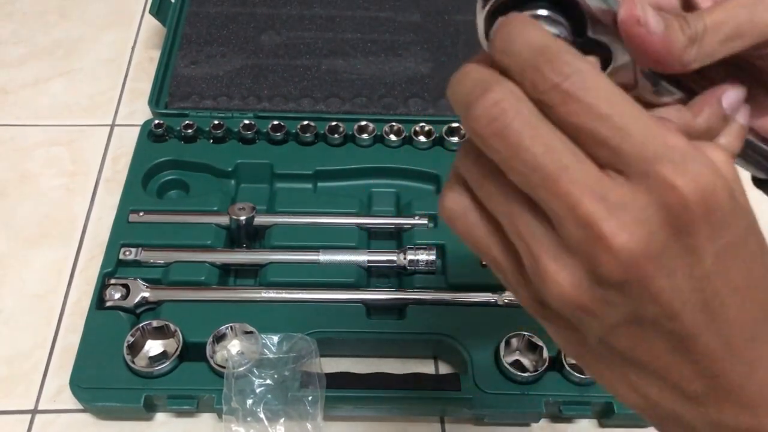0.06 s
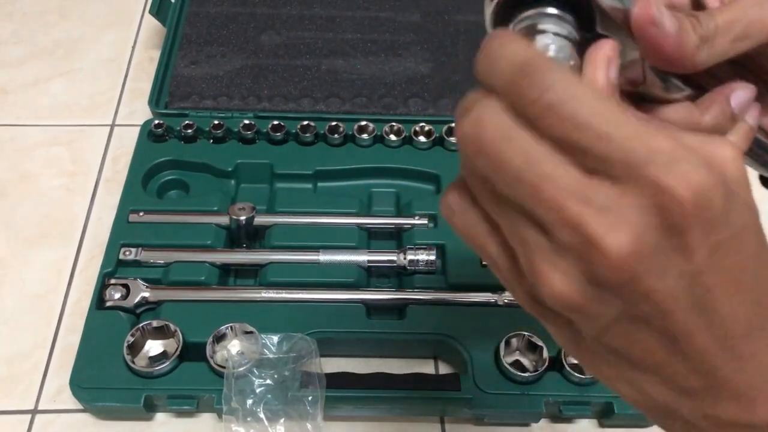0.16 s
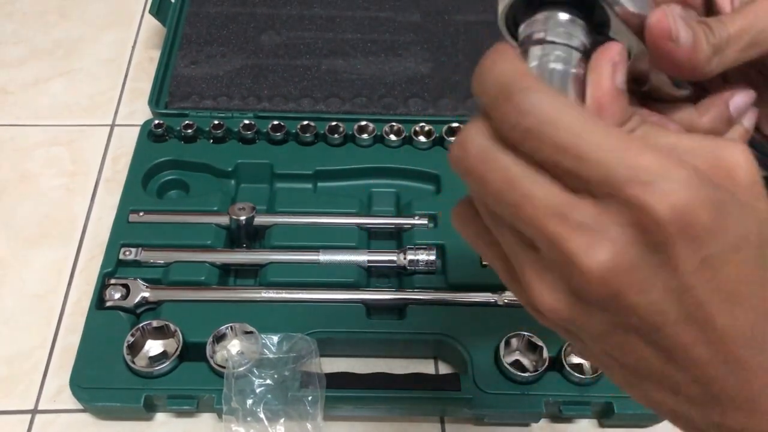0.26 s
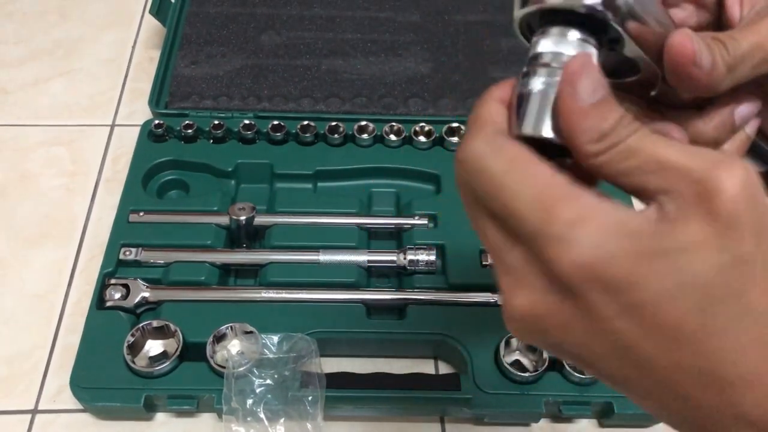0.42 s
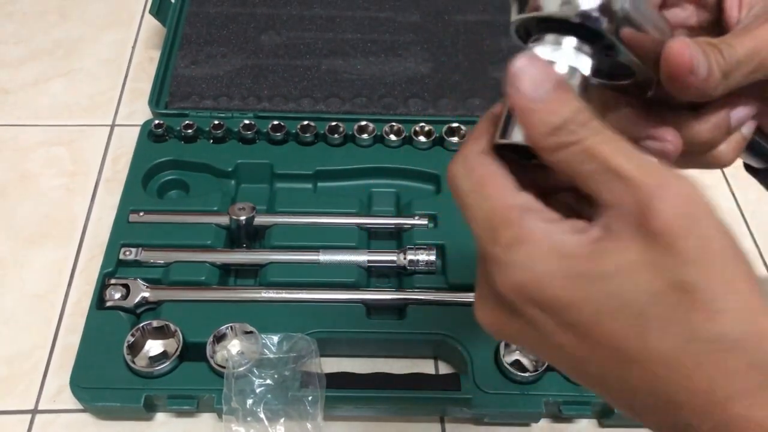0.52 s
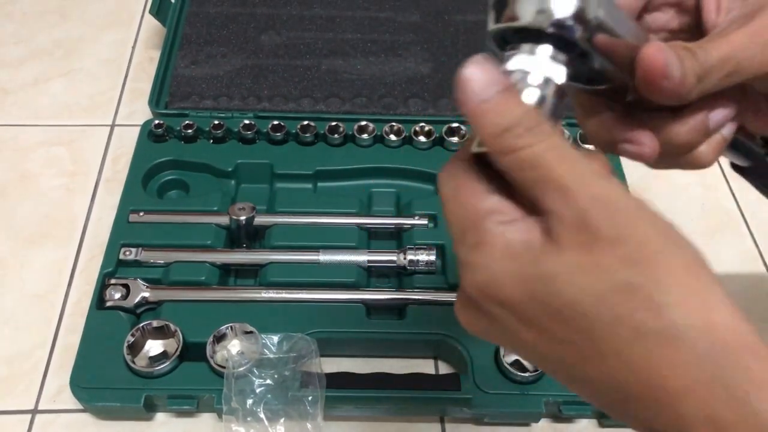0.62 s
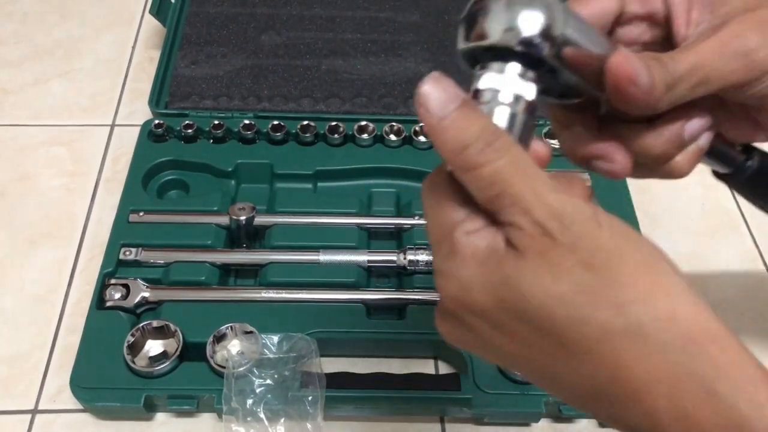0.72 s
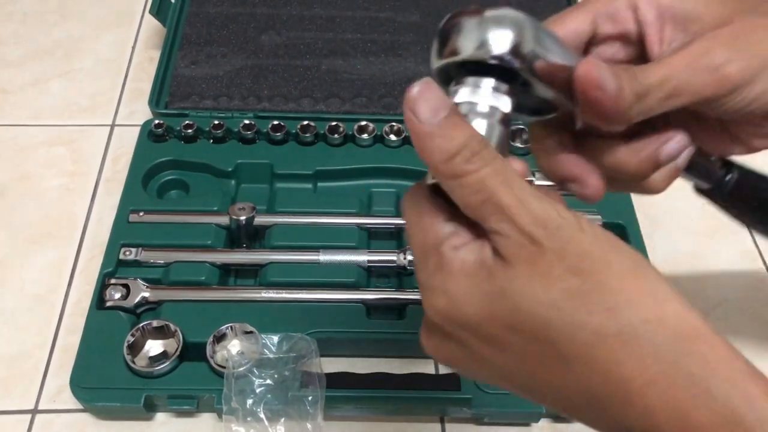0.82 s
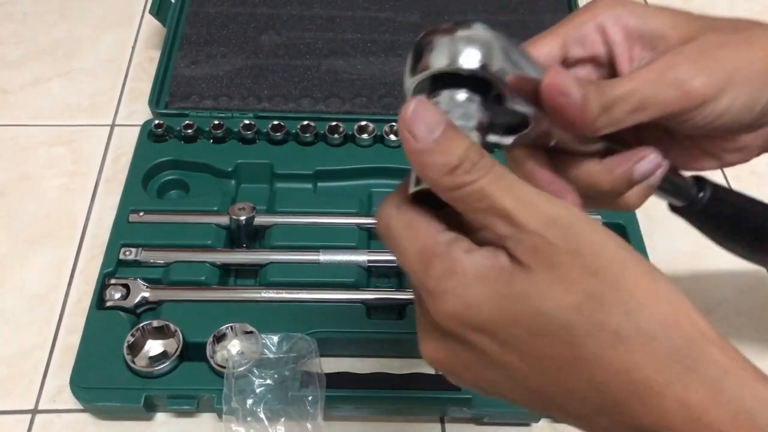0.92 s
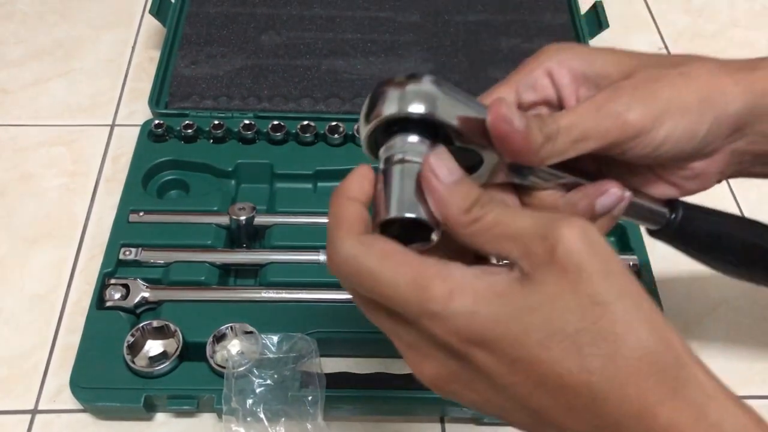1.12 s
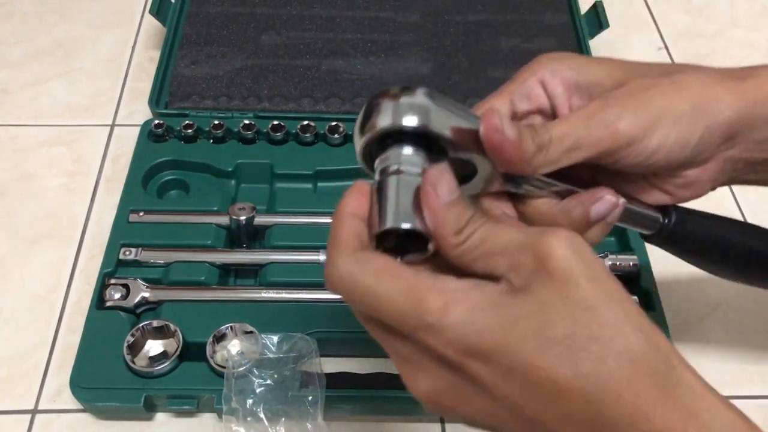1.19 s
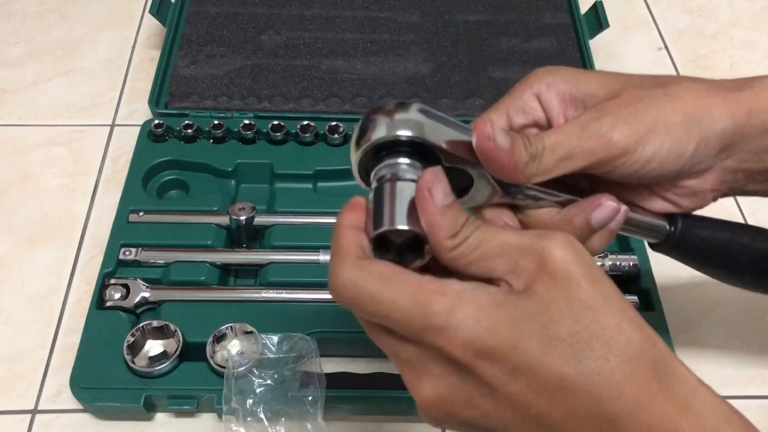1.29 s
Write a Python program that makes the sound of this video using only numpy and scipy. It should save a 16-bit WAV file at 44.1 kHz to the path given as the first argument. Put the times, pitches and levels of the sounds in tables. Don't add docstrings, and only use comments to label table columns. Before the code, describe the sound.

Ratchet wrench clicking: a socket snaps hard onto the drive, then a rapid burst of metallic clicks

```python
import sys
import numpy as np
from scipy import signal
from scipy.fft import rfft, irfft, next_fast_len
from scipy.io import wavfile

SR = 44100
rng = np.random.default_rng(int(sys.argv[2]) if len(sys.argv) > 2 else 0)


def ratio_of_db(decibels):
    return 10 ** (np.asarray(decibels, float) / 20)


def unload_audio(sound):
    columns = np.transpose(np.atleast_2d(sound))
    steps = np.round(np.clip(columns, -1, 1) * 32767)
    wavfile.write(sys.argv[1], SR, steps.astype(np.int16))


N = 59535


def along(points, hz):
    f, value = np.transpose(points)
    return np.interp(np.log(hz + 1), np.log(f + 1), value)


def causal(gain):
    cepstrum = irfft(np.log(gain + 1e-6))
    half = cepstrum.shape[-1] // 2
    cepstrum[..., 1:half] *= 2
    cepstrum[..., half + 1:] = 0
    return np.exp(rfft(cepstrum))


def noise(spectrum, db):
    size = next_fast_len(N + 8192)
    colour = ratio_of_db(along(spectrum, np.fft.rfftfreq(size, 1 / SR)))
    x = irfft(rfft(rng.standard_normal(size)) * colour, size)[:N]
    return ratio_of_db(db) * x / x.std()


# f/Hz, level/dB [per Hz]
RUMBLE = [(8.8, -32), (15, 4), (73, -7.5), (92, -14.5), (216, -29.5), (251, -24.5), (326, -36), (400, -33),
          (520, -57.5), (880, -120)]
# f/Hz, level/dB [per Hz]
HISS = [(180, -24), (420, -4), (1280, -14.5), (1800, -17.5), (6300, -24), (7300, -19), (8300, -26),
        (16000, -25.5)]
RUMBLE_DB, HISS_DB = -46.5, -66


def room_floor():
    return noise(RUMBLE, RUMBLE_DB) + noise(HISS, HISS_DB)


# f/Hz, t60/s
ROOM = [(300, .24), (1300, 0.54), (3500, 0.21), (9000, 0.32), (16000, .16)]
ROOM_DB, ROOM_DELAY_S = -10.5, 0.005


def room(clicks):
    hz, t, z = signal.stft(rng.standard_normal((len(clicks), SR // 3)), SR, nperseg=256)
    decay = ratio_of_db(-60 * t / along(ROOM, hz)[:, None])
    tail = signal.istft(z * decay, SR, nperseg=256)[1]
    tail = tail / np.linalg.norm(tail, axis=1, keepdims=True)
    tail = np.pad(tail, ((0, 0), (round(ROOM_DELAY_S * SR), 0)))
    return ratio_of_db(ROOM_DB) * signal.fftconvolve(clicks, tail, axes=1)


# f/Hz, level/dB, t60/s
THUD = [(331, -43, 0.02), (628, -42.5, 0.0071), (1016, -30.5, 0.027)]
SEAT_S = 0.2517
SEAT_RING_HZ, SEAT_RING_DB, SEAT_RING_T60, SEAT_RISE_PER_S = 1360, -47.5, 0.5, 120


def seating():
    t = np.clip(np.arange(N) / SR - SEAT_S, 0, None)
    thud = np.zeros(N)
    for hz, db, t60 in THUD:
        thud += ratio_of_db(db - 60 * np.minimum(t / t60, 2)) * np.sin(2 * np.pi * hz * t)
    envelope = ratio_of_db(SEAT_RING_DB - 60 * t / SEAT_RING_T60) * (1 - np.exp(-t * SEAT_RISE_PER_S))
    return thud + envelope * np.sin(2 * np.pi * SEAT_RING_HZ * t)


# f/Hz, level/dB [relative to the contact], t60/s
RING = [(2920, -41.5, 0.19), (6300, -57, .12), (9100, -48.5, 0.041), (12200, -49.5, 0.087)]
RING_LENGTH_S, RING_SCATTER_DB, RING_DETUNE = .22, 3.5, 0.0095


def free_ring(db, chance):
    t = np.arange(int(RING_LENGTH_S * SR)) / SR
    ring = np.zeros(len(t))
    for (hz, level, t60), (louder, sharper) in zip(RING, chance):
        envelope = ratio_of_db(db + level + RING_SCATTER_DB * louder - 60 * t / t60)
        ring += envelope * np.sin(2 * np.pi * hz * (1 + RING_DETUNE * sharper) * t)
    return ring


TOOTH_CHATTER_MS = 6
CHATTER_LOSS_DB, CHATTER_SCATTER_DB, FIRST_DB = 21, 2.5, 3


def chatter(hz, ms, jitter, chance):
    count = jitter.shape[1]
    when = (np.arange(count) + jitter) / count
    when[:, 0] = 0
    force_db = CHATTER_SCATTER_DB * chance - CHATTER_LOSS_DB * when + FIRST_DB * (when == 0)
    force = np.sign(chance) * ratio_of_db(force_db)
    delay_s = ms * when / 1000
    return (force[..., None] * np.exp(-2j * np.pi * hz * delay_s[..., None])).sum(axis=1)


# f/Hz, width/Hz, level/dB
STEEL = [(2720, 210, -10), (5277, 510, -1.5), (6340, 390, -10), (7216, 495, 3), (8324, 280, -5),
         (9600, 150, -0.5), (10030, 400, -6), (11276, 250, -3), (11750, 230, 3), (12900, 1000, -13),
         (14480, 450, -5.5)]
MODE_SCATTER_DB, DETUNE = 2.5, .01
GRIP = .6


def steel(hz, ms, chance):
    total = 0
    for k, (centre, width, level) in enumerate(STEEL):
        sharper, louder = chance[:, [2 * k]], chance[:, [2 * k + 1]]
        f = centre * (1 + DETUNE * sharper)
        w = width * (TOOTH_CHATTER_MS / ms) ** GRIP
        resonance = 1j * hz * w / (f * f - hz * hz + 1j * hz * w)
        total = total + (-1) ** k * ratio_of_db(level + MODE_SCATTER_DB * louder) * resonance
    return total


LOW_REF_DB, HIGH_REF_DB = -8.5, 1.5
SPLIT_LOW_HZ, SPLIT_HIGH_HZ, BRIGHT_TOP_HZ = 4000, 8800, 14300


def lean(hz, low_db, high_db):
    low, high = low_db - LOW_REF_DB, high_db - HIGH_REF_DB
    tilt_db = low / (1 + (hz / SPLIT_LOW_HZ) ** 4) + high / (1 + (SPLIT_HIGH_HZ / (hz + 1)) ** 6)
    tilt_db = tilt_db - np.clip(high, 0, None) / (1 + (BRIGHT_TOP_HZ / (hz + 1)) ** 10)
    return causal(ratio_of_db(tilt_db))


# f/Hz, level/dB
CRACK = [(150, -43), (600, -14.5), (2000, -5), (5000, -9), (9000, 4), (13000, -0.5), (15800, -7.5),
         (16800, -58.5)]
CRACK_DB = -7


def contacts(rows, size=1024, count=20):
    hz = np.fft.rfftfreq(size, 1 / SR)
    _, db, low_db, high_db, ms = np.transpose(rows)[:, :, None]
    jitter = rng.random((len(rows), count))
    chance = rng.standard_normal((len(rows), count + 2 * len(STEEL)))
    blows = chatter(hz, ms, jitter, chance[:, :count])
    crack = ratio_of_db(CRACK_DB) * causal(ratio_of_db(along(CRACK, hz)))
    body = crack + steel(hz, ms, chance[:, count:])
    x = irfft(blows * body * lean(hz, low_db, high_db), size)
    return ratio_of_db(db) * x / abs(x).max(axis=1, keepdims=True)


# t/s, peak level/dB, low share/dB, high share/dB, chatter/ms
SNAPS = [(.2066, -39, -18, 1, 1), (.2149, -57, -18, 6, 1), (.2322, -10.5, -15, -3, 7),
         (.2377, -17, -12, -3, 6), (.2429, -16, -10, -5, 6), (.2494, -17, -7, 1, 6),
         (.2517, .5, -9, 15, 1.2), (.2536, -6, -3, 1, 5), (.2602, -11, -14, -4, 5),
         (.2741, -11, -14, -2, 4), (.2959, -13.5, -13, -1, 4), (.4002, -21, -11, -3, 3),
         (.9312, -32, -13, -16, 3), (.9375, -41, -5, -9, 2.5), (1.0115, -56, 6, -12, 1.5),
         (1.068, -57, 6, -8, 1.5), (1.2969, -39, -6, -30, 3)]
# t/s, peak level/dB, low share/dB, high share/dB
TEETH = [(0.359, -11, -13, -2), (0.3682, -13, -12, -3), (0.4017, -10, -16, -4), (0.4089, -16, -10, -3),
         (0.4246, -16, -10, -6), (0.4574, -10, -12, -3), (0.4668, -16, -9, -4), (0.4835, -16, -10, -1),
         (0.4981, -16, -8, 2), (0.5182, -14, -8, 4), (0.5311, -13, -10, 2), (0.5488, -15, -11, -1),
         (0.5608, -13, -9, 1), (0.5803, -13, -11, -1), (0.5912, -11, -9, 0), (0.6197, -15, -6, 0),
         (0.6301, -17, -6, 0), (0.6616, -15, -8, -2), (0.6696, -14, -6, 0), (0.6824, -13, -9, 0),
         (0.718, -13, -10, -1), (0.7263, -14, -8, 1), (0.786, -12, -8, 1), (0.7946, -16, -6, 2)]


def ratchet():
    rows = SNAPS + [(*row, TOOTH_CHATTER_MS) for row in TEETH]
    clicks = contacts(rows)
    chances = rng.standard_normal((len(rows), len(RING), 2))
    out = np.zeros(N + SR)
    for (s, db, *_), click, tail, chance in zip(rows, clicks, room(clicks), chances):
        for part in (click, tail, free_ring(db, chance)):
            out[round(s * SR):][:len(part)] += part
    return out[:N]


def scene():
    return (ratchet() + seating() + room_floor())[None]


def low_pass(x):
    return signal.sosfilt(signal.butter(12, 16970, fs=SR, output="sos"), x)


def record(dry):
    x = dry / (1 + abs(dry / 1.05) ** 8) ** (1 / 8)
    x = signal.sosfiltfilt(signal.butter(12, 16100, fs=SR, output="sos"), x)
    return low_pass(x)


dry = scene()
out = record(dry)
unload_audio(out)
```